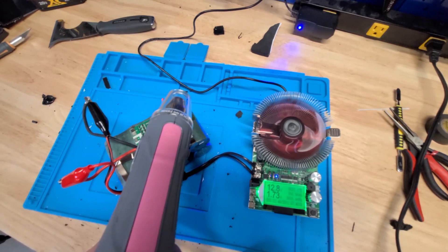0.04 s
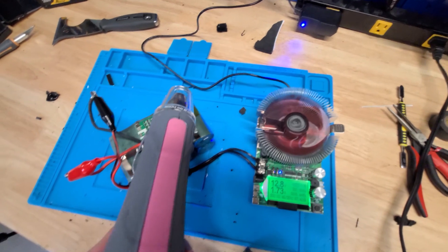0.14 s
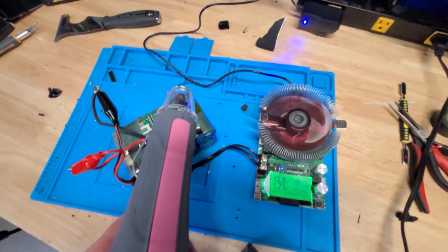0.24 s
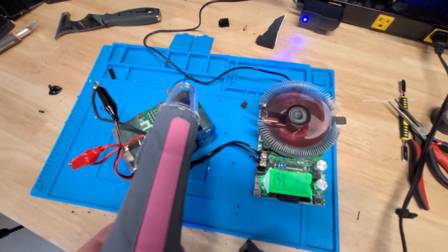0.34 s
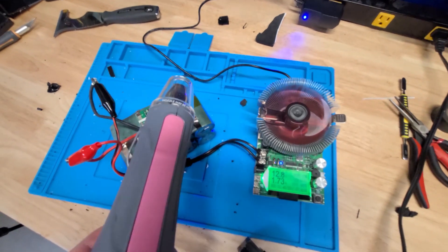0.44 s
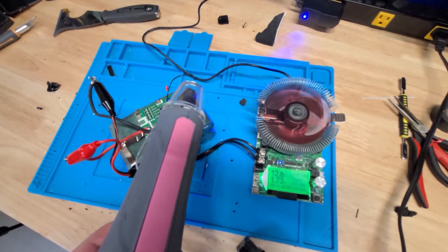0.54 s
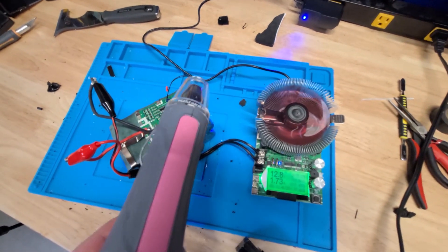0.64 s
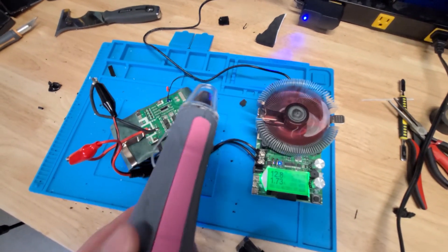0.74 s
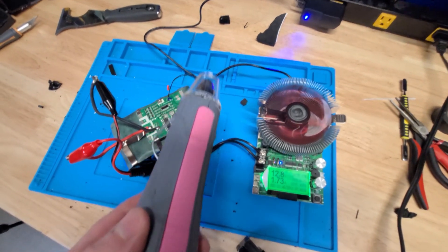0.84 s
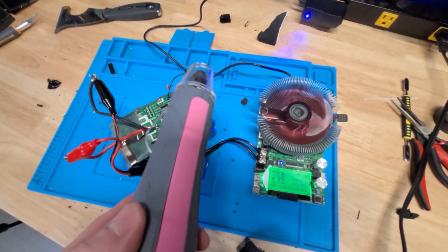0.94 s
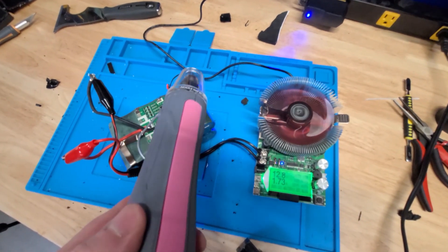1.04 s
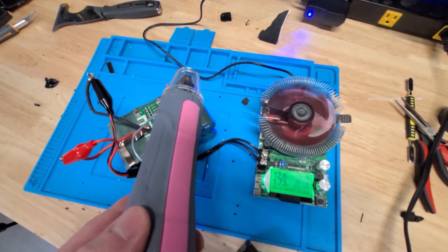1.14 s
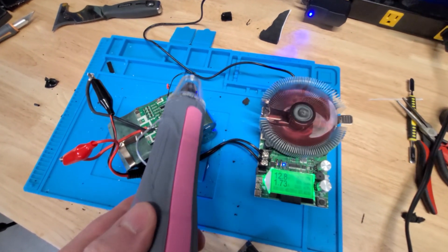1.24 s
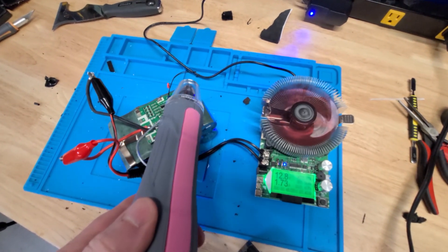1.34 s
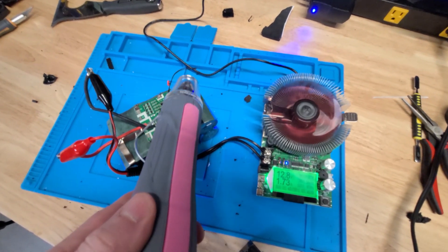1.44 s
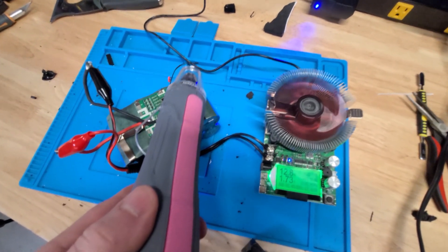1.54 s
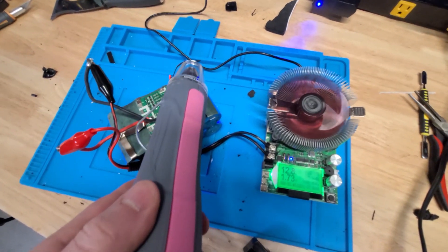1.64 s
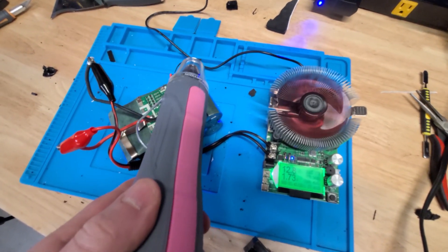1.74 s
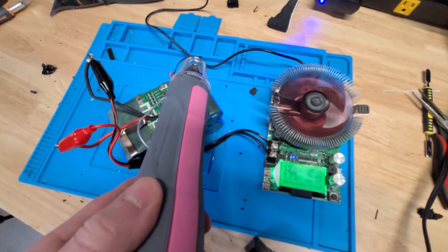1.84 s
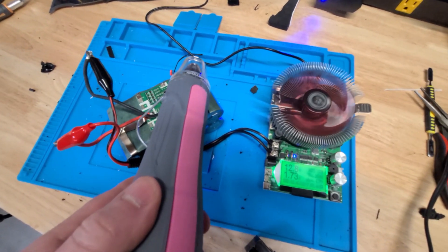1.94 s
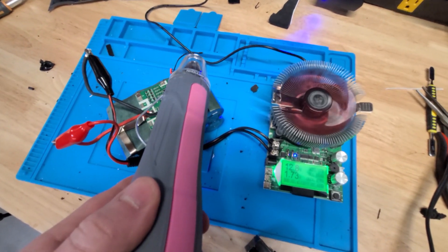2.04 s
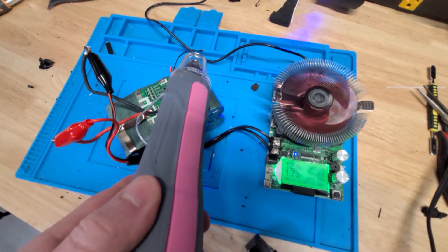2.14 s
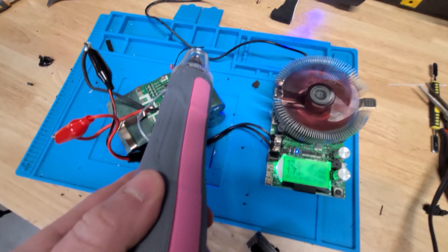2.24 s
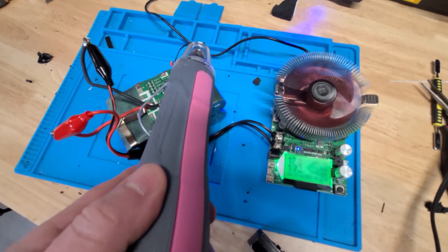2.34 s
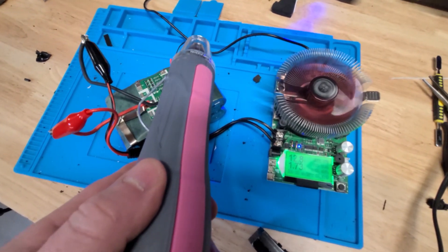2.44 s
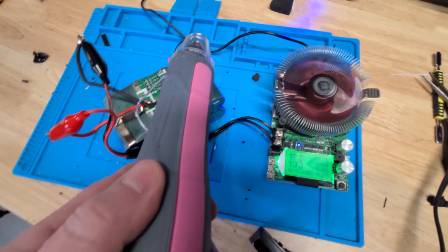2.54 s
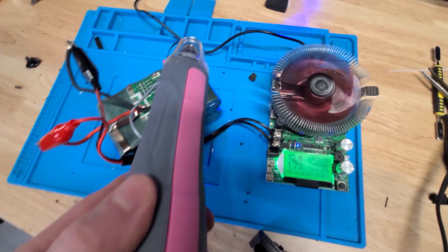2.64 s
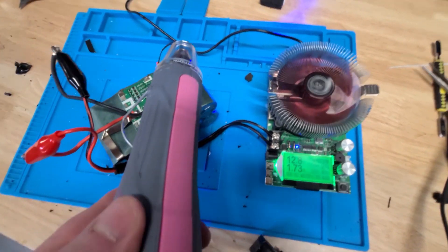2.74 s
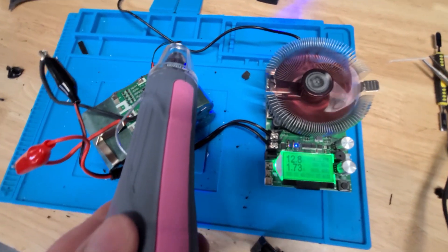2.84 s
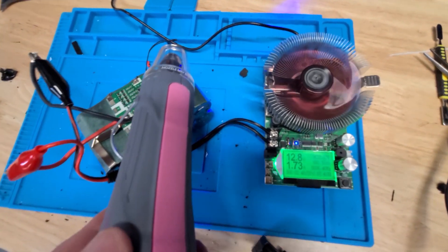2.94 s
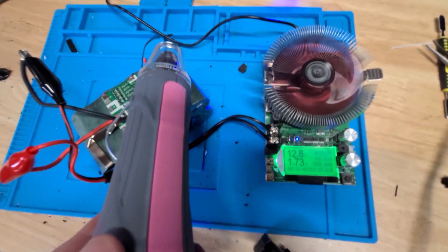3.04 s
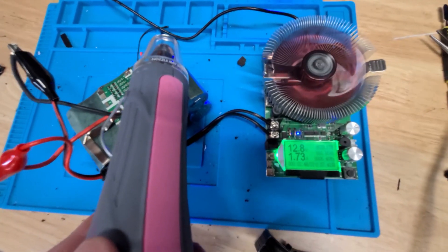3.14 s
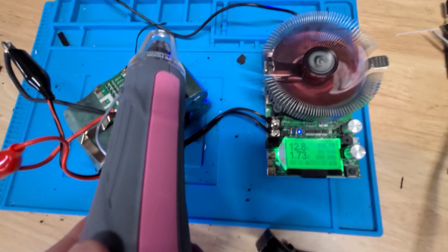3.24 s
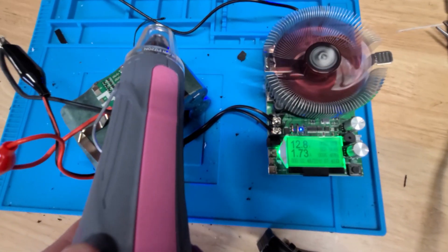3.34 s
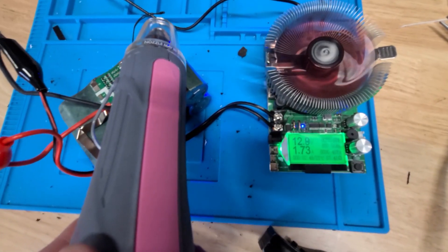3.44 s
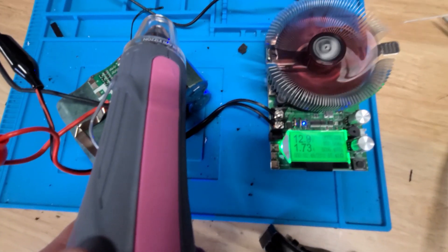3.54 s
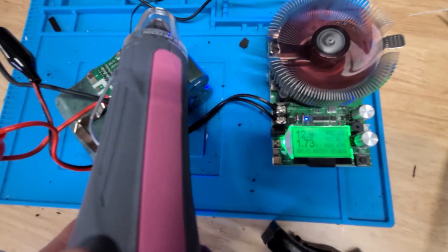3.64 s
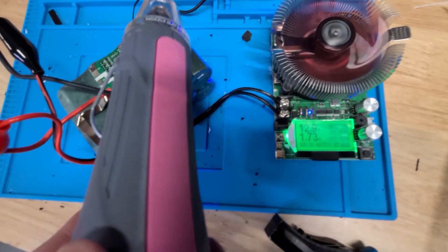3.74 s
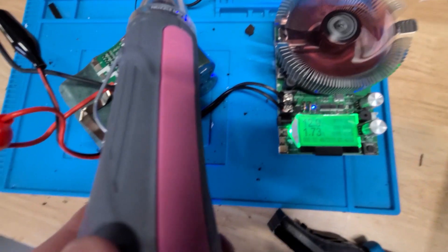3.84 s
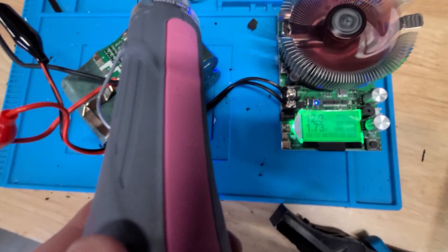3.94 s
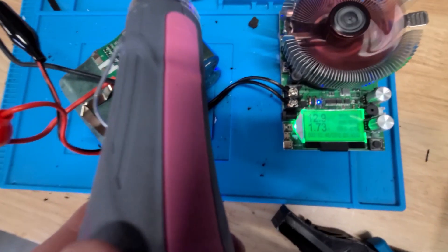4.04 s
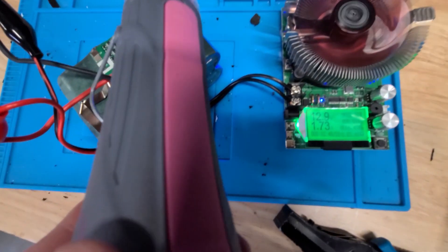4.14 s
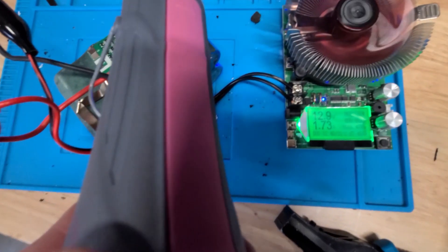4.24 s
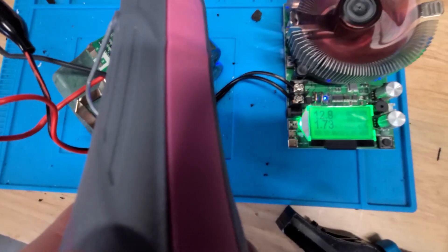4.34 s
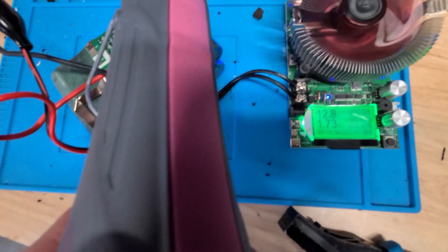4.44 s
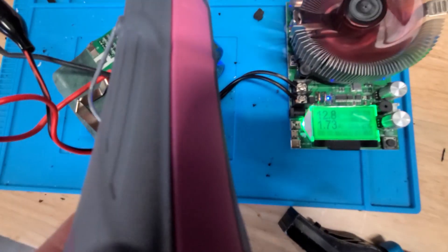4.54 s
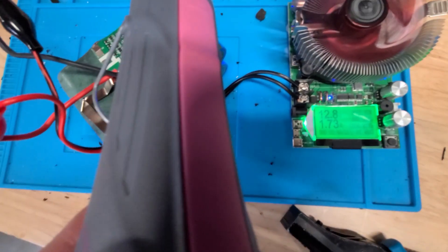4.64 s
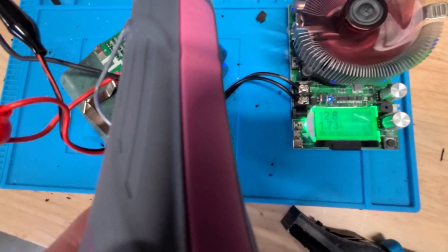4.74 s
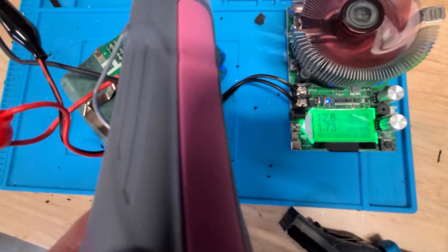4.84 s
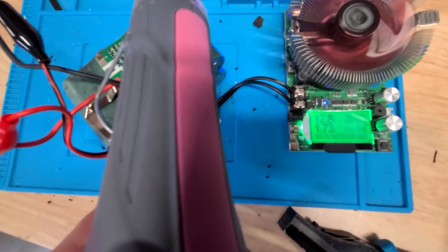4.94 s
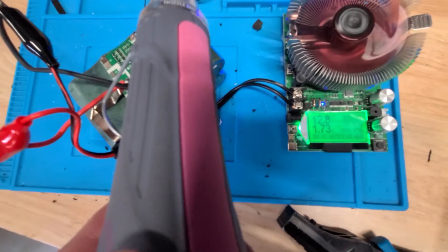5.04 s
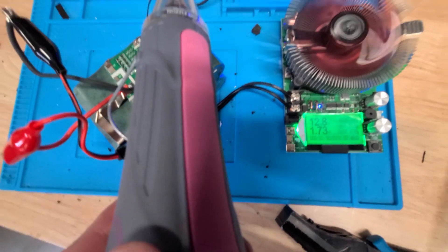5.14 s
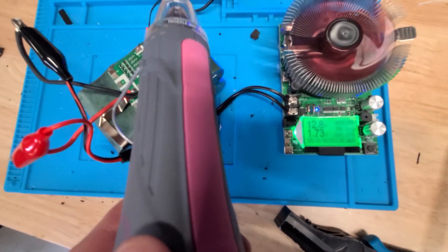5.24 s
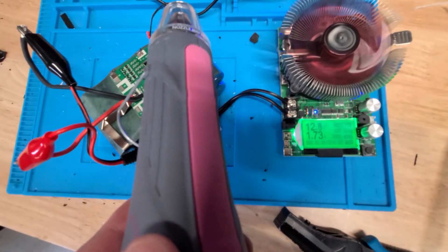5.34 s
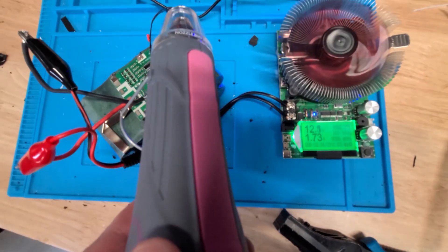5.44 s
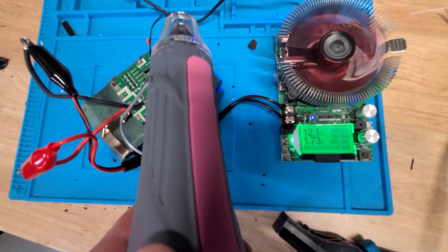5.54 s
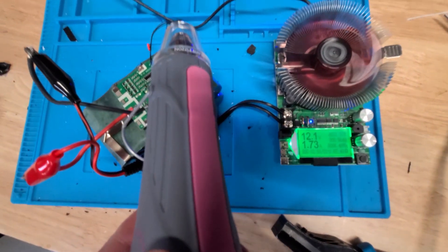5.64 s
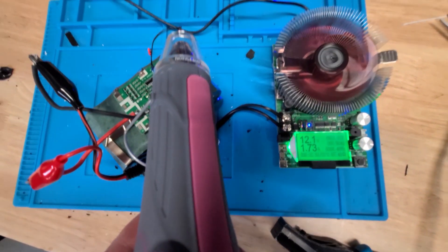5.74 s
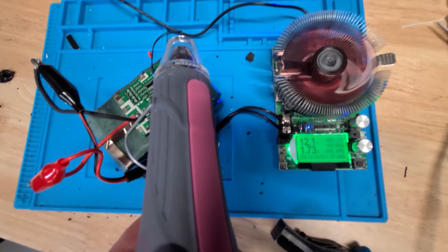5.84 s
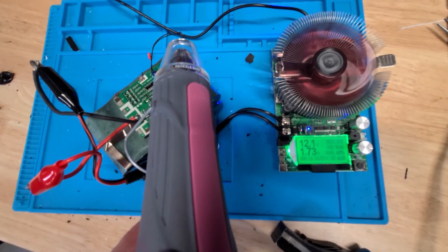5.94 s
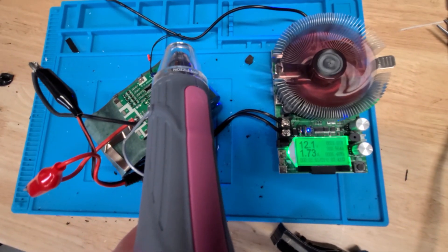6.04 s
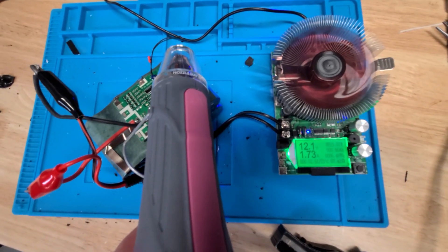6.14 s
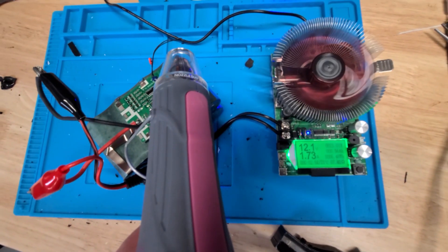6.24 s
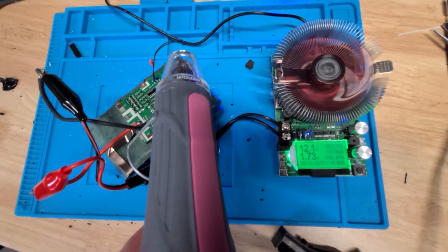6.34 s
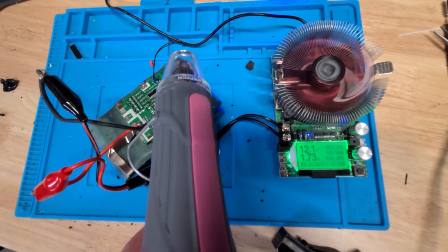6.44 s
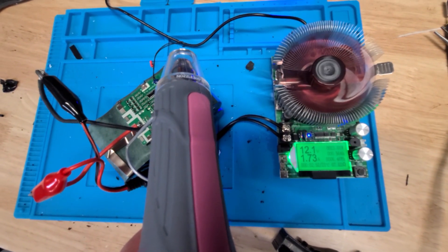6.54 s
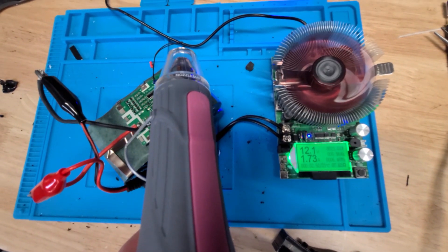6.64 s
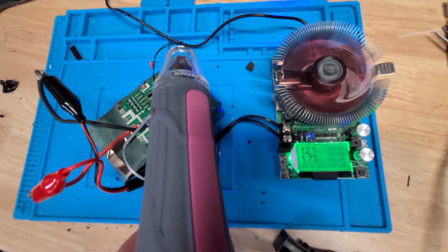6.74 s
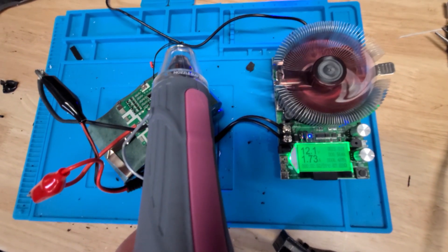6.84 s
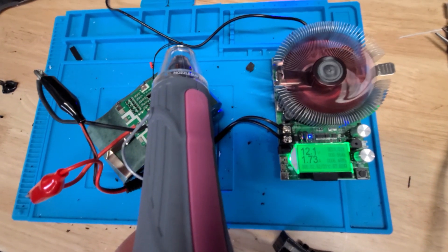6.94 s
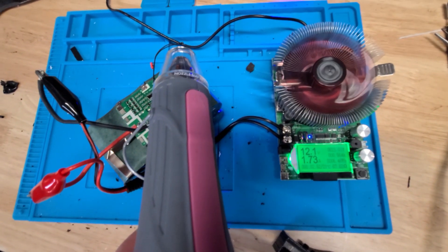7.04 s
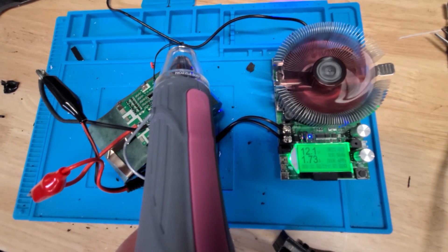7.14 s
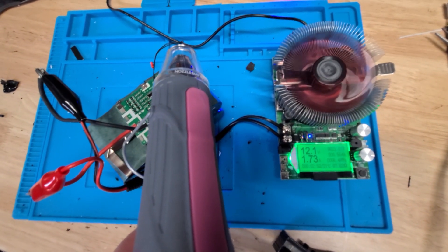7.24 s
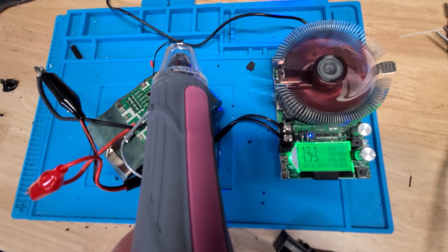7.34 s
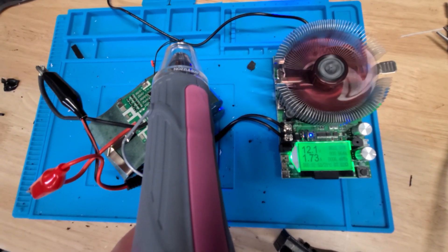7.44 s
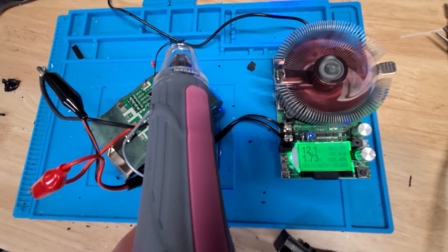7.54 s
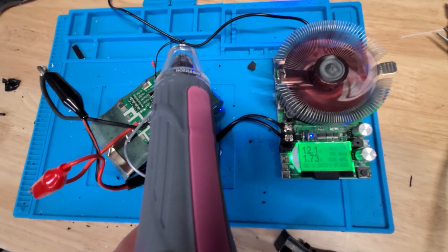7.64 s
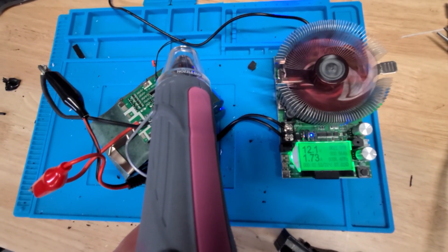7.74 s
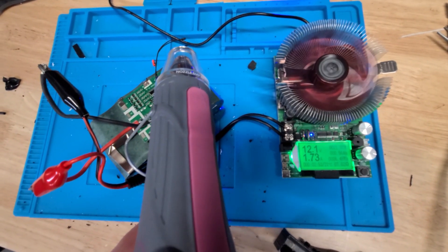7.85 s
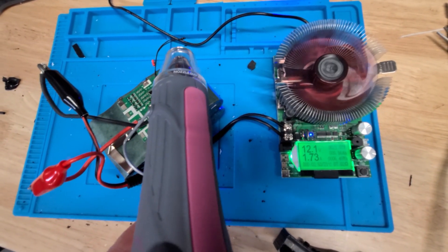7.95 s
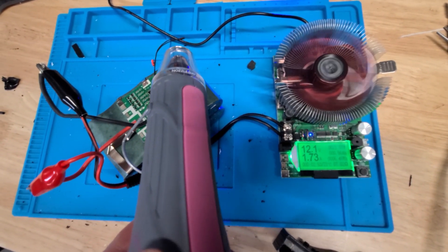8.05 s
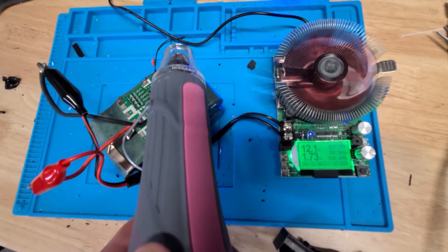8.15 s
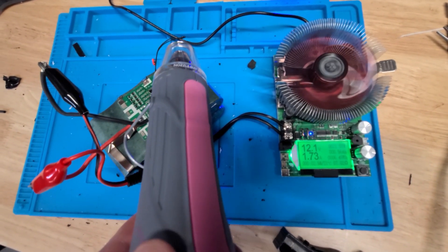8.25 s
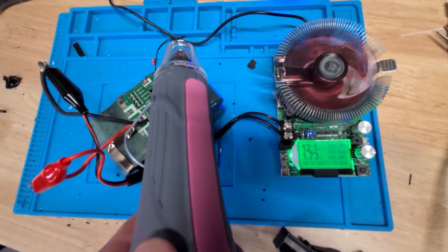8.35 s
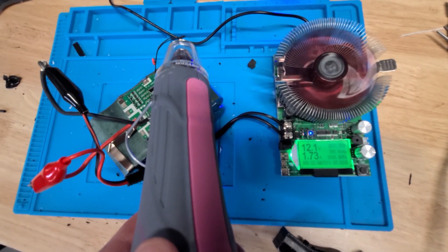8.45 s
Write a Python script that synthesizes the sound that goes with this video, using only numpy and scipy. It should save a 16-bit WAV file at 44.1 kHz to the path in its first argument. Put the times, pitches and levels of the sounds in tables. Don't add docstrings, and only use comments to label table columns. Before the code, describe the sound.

A handheld heat gun is switched on over a work bench. First comes faint low room hum and a brief skin scuff, then a hard plastic click with small motor kicks. The motor's pitch sweeps up rapidly and settles into a many-toned whine beneath dense, hollow, hissing airflow. It runs on without stopping, heard close and nearly mono, with subtle changes of colour.

```python
import sys
import numpy as np
from scipy import signal
from scipy.fft import rfft, irfft, next_fast_len
from scipy.io import wavfile
from scipy.ndimage import uniform_filter1d

SR = 44100
rng = np.random.default_rng(int(sys.argv[2]) if len(sys.argv) > 2 else 0)


def digitize_waveform(pressure):
    field = np.atleast_2d(pressure).T
    bounded = np.clip(field, -1, 1)
    quanta = np.round(bounded * 32767).astype(np.int16)
    wavfile.write(sys.argv[1], SR, quanta)


def invert_db(x):
    u = np.asarray(x, float) / 20
    return 10 ** u


N = 374850
T = np.arange(N) / SR
SIZE = next_fast_len(N + SR // 2)
HZ = np.maximum(np.fft.rfftfreq(SIZE, 1 / SR), 1)
ON_S = .405


def level(x, db):
    return x * invert_db(db) / np.sqrt(np.mean(x ** 2))


def bump(hz, centre_hz, width_hz):
    return np.exp(-.5 * ((hz - centre_hz) / width_hz) ** 2)


def shape(x, db):
    return irfft(rfft(x, SIZE) * invert_db(db), SIZE)[:N]


def spectrum(points):
    hz, db = np.transpose(points)
    return np.interp(np.log(HZ), np.log(hz), db)


def walk(rate_hz, t=T):
    knots = np.repeat(rng.standard_normal(int(T[-1] * rate_hz) + 3), 8)
    knots = 1.394 * uniform_filter1d(uniform_filter1d(knots, size=8), size=8)
    return np.interp(t * rate_hz * 8, np.arange(len(knots)), knots)


# frequency in Hz, density in dB per Hz.
ROOM = [(12, -27), (20, 0.5), (66, -9), (87, -19), (112, -9), (171, -28), (202, -8), (232, -20), (393, -19),
        (631, -17), (857, -17.5), (1070, -19), (15500, -50)]
# frequency in Hz, level in dB.
HUM = [(59.8, -64), (199.2, -62), (403.7, -63.5), (845.2, -64)]


def workshop():
    hum = 0
    for hz, db in HUM:
        hum = hum + np.sqrt(2) * invert_db(db + 1.5 * walk(4.7)) * np.sin(2 * np.pi * hz * T)
    return level(shape(rng.standard_normal(N), spectrum(ROOM)), -48) + hum


# start in seconds, hold in seconds, level in dB.
THUMB = [
    (.11, .02, -65),
    (.28, .105, -56),
]


def thumb():
    rise_s, fall_s = .012, .08
    rub = level(shape(rng.standard_normal(N), 18 * bump(np.log2(HZ), 11.2, .9)), 0)
    press = 0
    for s, hold_s, db in THUMB:
        rise = np.clip((T - s) / rise_s, 0, 1)
        fall = np.exp(-np.maximum(T - s - hold_s, 0) / fall_s)
        press = press + invert_db(db) * rise * fall
    slips = invert_db(3.5 * walk(117))
    return rub * press * (T < ON_S) * slips


# start in seconds, peak in dB, rattle decay in seconds, tilt in dB per octave.
SWITCH = [
    (0.3885, -22, 0.0023, 1),
    (0.4003, -10.5, 0.0032, -2),
    (0.434, -23, .004, -12),
    (0.443, -21, .004, -7),
    (.4545, -22, .006, -11),
    (.476, -19, .006, -12),
]
# frequency in Hz, density in dB per Hz.
ROCKER = [(300, -43), (900, -26), (1400, 2), (2200, 0.5), (2700, -2), (3200, 0), (4200, 0), (5800, -7),
          (8500, -12), (12000, -22), (15500, -24)]


def switch():
    bench_db, bench_s, rise_s = -9, 0.016, .0008
    out = np.zeros(N)
    for s, db, decay_s, tilt_db in SWITCH:
        t = np.maximum(T - s, 0)
        fall = np.exp(-t / decay_s) + invert_db(bench_db) * np.exp(-t / bench_s)
        colour_db = spectrum(ROCKER) + tilt_db * np.log2(np.maximum(HZ, 1500) / 3000)
        click = np.minimum(t / rise_s, 1) * fall * shape(rng.standard_normal(SR), colour_db)
        out += invert_db(db) * click / np.abs(click).max()
    return out


# time in seconds, shaft speed in Hz.
SHAFT = [(1.25, 278.32), (2.25, 279.24), (3.25, 280.07), (4.25, 280.77), (5.25, 281.74), (6.25, 283.1),
         (7.25, 284.25), (8.25, 285.23), (8.5, 285.5)]


def shaft():
    spin_from_s, spin_s, hunt = .392, .105, 0.0003046
    steady_hz = np.interp(T, *np.transpose(SHAFT))
    share = 1 - np.exp(-(np.maximum(T, ON_S) - spin_from_s) / spin_s)
    turn = 2 * np.pi * np.cumsum(steady_hz * share * (1 + hunt * walk(8))) / SR
    return steady_hz, share, turn


def places():
    lean_in_s, lean_back_s, lean_s = 3.68, 6.1, 1
    close, back = (np.clip((T - s) / lean_s + .5, 0, 1) for s in (lean_in_s, lean_back_s))
    return np.array([1 - close, close - back, back])


# frequency in Hz, width in Hz, gain in dB.
SHELL = [(229, 27, 8), (830, 120, 7.5), (1430, 40, 11), (1980, 60, 1), (2280, 160, 10.5), (2650, 100, 4),
         (3620, 120, 6), (5100, 300, 11), (5494, 45, 11)]


def shell_db(hz):
    return sum(db * bump(hz, centre_hz, width_hz) for centre_hz, width_hz, db in SHELL)


# shaft multiple, start in seconds, end in seconds, gain in dB.
SWELLS = [(13, .4, 1.6, -9), (12, 0.496, .59, 7.5), (3, 7.6, 9, -2), (15, 2.9, 3.8, 2), (9, .56, .92, 3.5),
          (5, .4, 0.92, -1.5), (5, .4, 1.8, -0.5), (48, .6, 2.4, 4), (7, 0.87, 1.4, 4), (10, .9, 2.06, -3),
          (10, 2.1, 3.3, 2.5), (5, 2.3, 4.6, 2), (30, 2.4, 3.1, 7), (7, 2.6, 3.2, -4), (16, 2.6, 4.1, 5.5),
          (14, 7.3, 9, 9.5), (13, 4.4, 5.5, -3), (6, 3.7, 5, 1.5), (15, 4.7, 6, -4), (26, 5.4, 6.3, 6),
          (7, 6.9, 7.9, -8), (6, 7.3, 9, -5), (47, 7.7, 9, 7)]


def swell_db(multiple, t):
    gain_db = 0
    for m, from_s, to_s, db in SWELLS:
        if round(m) == multiple:
            gain_db = gain_db + db * np.clip(np.minimum(t - from_s, to_s - t) / .05 + .5, 0, 1)
    return gain_db


# shaft multiple, far level in dB, close level in dB, half-way level in dB.
BLADES = [(1, -55, -52, -52), (2, -51, -51, -51), (3, -31, -31, -30), (4, -52, -44, -39),
          (5, -29, -29, -29), (6, -36, -32, -34), (7, -33, -40, -40), (8, -35, -33, -34),
          (9, -38, -46, -46), (10, -38, -39, -40), (11, -44, -51, -59), (12, -46, -43, -42),
          (13, -38, -38, -41), (14, -43, -49, -49), (15, -41, -42, -47), (16, -48, -41, -40),
          (17, -53, -56, -45), (18, -52, -55, -54), (19, -49, -53, -50), (20, -45, -51, -52),
          (21, -61, -58, -51), (22, -61, -56, -60), (23, -57, -60, -60), (24, -60, -52, -57),
          (25, -59, -54, -56), (26, -59, -54, -51), (27, -61, -60, -57), (28, -61, -56, -58)]
# shaft multiple, far level in dB, close level in dB, half-way level in dB.
BRUSHES = [(29, -65, -62, -58), (39, -69, -68, -57), (40, -65, -61, -63), (41, -67, -66, -62),
           (42, -65, -67, -64), (45, -68, -62, -60), (46, -72, -63, -64), (47, -67, -69, -58),
           (48, -58, -60, -67), (50, -60, -59, -65), (51, -63, -70, -66)]


def brush_lines():
    last_line, top_db, fall_db, scatter_db = 55, -65, -.25, 2.5
    strong = [row[0] for row in BRUSHES]
    lines = list(BRUSHES)
    for k in range(len(BLADES) + 1, last_line + 1):
        if k not in strong:
            db = top_db + fall_db * (k - len(BLADES)) + scatter_db * rng.standard_normal(3)
            lines.append((k, *db))
    return lines


def whine(steady_hz, share, turn, ripple, place):
    step, poles, start_current_db = 64, 4, 26
    t, place = T[::step], place[:, ::step]
    steady, speed = steady_hz[::step], (steady_hz * share)[::step]
    lag_db = 20 * np.log10(share)[::step]
    turn = turn + .016 * ripple
    out = 0
    for rows, throb, waver_db in ((BLADES, .03, .9), (brush_lines(), .25, 2.5)):
        comb = 0
        for k, *heard_db in rows:
            db = np.dot(heard_db, place) + shell_db(k * speed) - shell_db(k * steady) + swell_db(k, t)
            if k % poles == 0:
                db = db + start_current_db * (1 - invert_db(lag_db))
            db = db + max(k - 21, 0) * .8 * lag_db
            db = db + waver_db * walk(3.07, t) + 0.67 * walk(20, t)
            comb = comb + np.interp(T, t, invert_db(db)) * np.sin(k * turn + 2 * np.pi * rng.random())
        out = out + comb * (1 + throb * ripple)
    return np.sqrt(2) * out * share ** 2.0


SPEED_POWER = [1.7, .6, 2.3]
SETTLE_DB = [-3, -3, 1.7]
SURGE_DB = [-1, 0.5, 0.5]
# roar level in dB, rush
# level in dB, hiss level in dB.
LEAN_DB = [(-.4, 0.65, -.7), (0.37, -.6, .3), (.1, -0.34, .4)]
AIR_ON_S = 0.43


def flow(share, place):
    settle_s, surge_at_s, surge_s = 0.31, 1.24, 0.13
    settle = np.exp(-np.maximum(T - AIR_ON_S, 0) / settle_s)
    surge = bump(T, surge_at_s, surge_s)
    fan_db = np.outer(SPEED_POWER, 20 * np.log10(share))
    return fan_db + np.outer(SETTLE_DB, settle) + np.outer(SURGE_DB, surge) + np.transpose(LEAN_DB) @ place


FLOW_HZ = [750, 2300, 4500]
# frequency in Hz, density in dB per Hz.
AIR = [(60, -39), (200, -27.5), (330, -17), (600, -11.5), (1200, -15), (2400, -15.5), (3500, -16),
       (4300, -22.5), (6500, -29), (9000, -33.5), (13000, -38), (14500, -42), (15700, -45)]
# frequency in Hz, width in Hz,
# far gain in dB, close gain in dB, half-way gain in dB.
RESONANCES = [(417.5, 39.6, 6, 5, 6.5), (489, 27, -2.5, -1, -2.5), (662, 66.5, 11, 10.5, 10),
              (798.5, 74.4, 10.5, 10, 10.5), (998, 92, 8, 8.5, 9), (1322, 57, 4, 5.5, 5),
              (1648, 144, 5, 7, 7.5), (1783, 29, -8, -12, -7.5), (1918, 59, 10, 7.5, 9.5),
              (2102, 36, 6.5, 5, 6.5), (2610, 70, -1, -3, -1.5), (3010, 46, 1.5, 6, 7),
              (3130, 42, -3.5, -5, -4), (3727, 125, 6, 3.5, 4),
              (4150, 80, 1, 1, 2), (4550, 105, 3, 3, -1), (4810, 53, 4, 7, 8), (5580, 80, 3.5, -3, -0.5),
          (5930, 100, 3, 2.5, 1.5), (6300, 160, -1, -1.5, -1.5), (8000, 80, 3.5, 4.5, 4),
          (7480, 130, 5, 2, 2), (8440, 87, 5, 7, 6), (9500, 200, 3.5, 1.5, 1), (10700, 250, 0, -1.5, -3.5),
          (11200, 150, -1, 1, 0), (11750, 200, 2, 4, 3.5), (12600, 150, -1, 2, 3),
              (908, 25, -6, -4.5, -3.5), (932, 21, 6, 2.5, 1), (1150, 27, -0.5, -3, 0.5),
         (1406, 27, -16, -10, -9), (3920, 40, -6, -0.5, 1), (4200, 60, 0, -4, -4), (8360, 60, 0, -5, -3),
         (9000, 80, -2, -4, -2), (10350, 80, 1, -2, -2), (13000, 200, -3, -3, -3)]


def air(share, turn, ripple, place):
    air_rise_s, air_db, spacing_oct = 0.038, -18.5, .75
    flow_db = flow(share, place)
    out, gust = 0, walk(26)
    for hz in 60 * 2 ** np.arange(0, 8.3, spacing_oct):
        offset = np.clip(np.log2(HZ / hz) / spacing_oct, -1, 1)
        band = shape(rng.standard_normal(N), 20 * np.log10(np.cos(offset * np.pi / 2) + 1e-9))
        mix = [np.interp(np.log(hz), np.log(FLOW_HZ), one) for one in np.eye(len(FLOW_HZ))]
        treble = np.clip(np.log2(hz / 1500) / 2, 0, 1)
        db = np.array(mix) @ flow_db + treble * .5 * gust + (0.18 + 0.18 * treble) * walk(20)
        chop = 0.091 * np.cos(turn) + 0.077 * np.cos(2 * turn) + 0.018 * ripple
        out = out + band * invert_db(db) * (1 + treble * chop)
    out = out * np.clip((T - AIR_ON_S) / air_rise_s, 0, 1)
    peaks = RESONANCES
    bells = np.array([bump(HZ, row[0], row[1]) for row in peaks])
    colours_db = spectrum(AIR) + np.array(peaks)[:, 2:].T @ bells
    heard = sum(part * shape(out, db) for part, db in zip(place, colours_db))
    return level(heard, air_db)


def scene():
    steady_hz, share, turn = shaft()
    ripple = np.cos(2 * np.pi * 120 * T)
    place = places()
    mono = workshop() + thumb() + switch()
    mono = mono + whine(steady_hz, share, turn, ripple, place) * (T > ON_S)
    mono = mono + air(share, turn, ripple, place)
    return np.array([mono, mono])


def difference(mono):
    count, low_hz, high_hz, wide_hz, fill_db, hiss_db, n = 30, 4200, 14500, 1400, -1, -80, 2048
    hiss = shape(rng.standard_normal(N), -40. * ((HZ < 4500) | (HZ > 12000)))
    side = level(hiss, hiss_db) * (T < ON_S)
    hz = np.fft.rfftfreq(n, 1 / SR)
    for when, where in rng.random((count, 2)):
        first = int(ON_S * SR + n + when * (N - ON_S * SR - 2 * n))
        from_hz = low_hz + where ** 1.4 * (high_hz - low_hz)
        band = np.abs(rfft(mono[first:first + n])) * (hz > from_hz) * (hz < from_hz + wide_hz)
        noise = irfft(band * np.exp(2j * np.pi * rng.random(len(hz))))
        side[first:first + n] += invert_db(fill_db) * signal.windows.kaiser(n, 9) * noise
    return side


def low_pass(x):
    return signal.sosfilt(signal.butter(12, 16450, fs=SR, output="sos"), x)


def record(dry):
    mono = shape(dry[0], -80. * (HZ > 15730))
    side = difference(mono)
    return low_pass(np.array([mono + side, mono - side]))


dry = scene()
out = record(dry)
digitize_waveform(out)
```